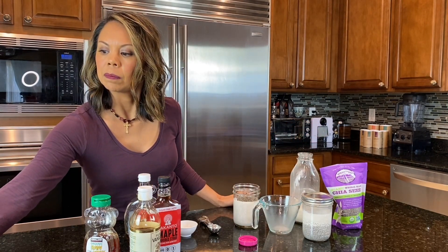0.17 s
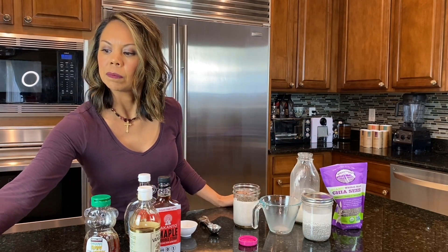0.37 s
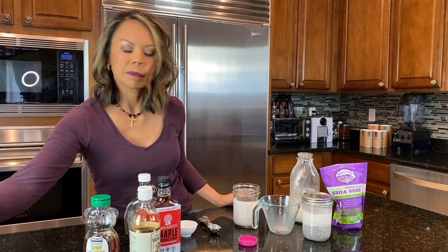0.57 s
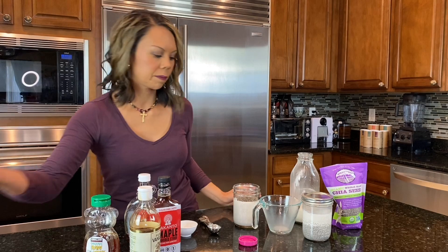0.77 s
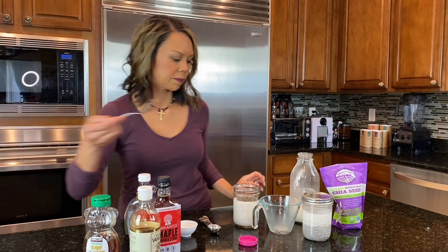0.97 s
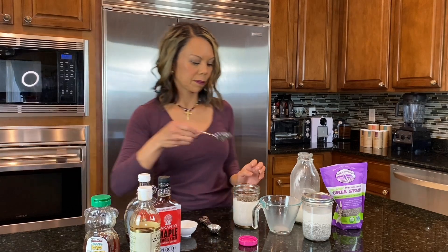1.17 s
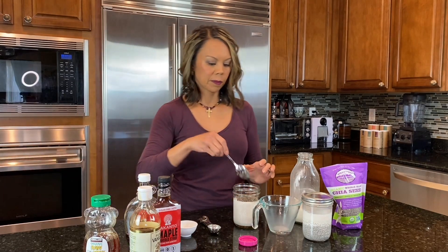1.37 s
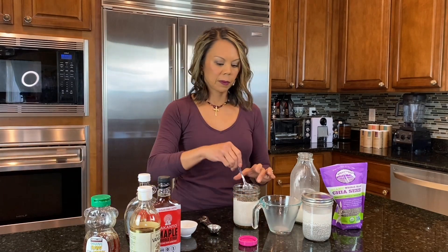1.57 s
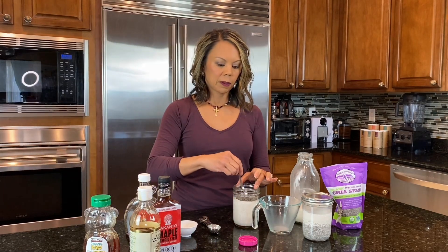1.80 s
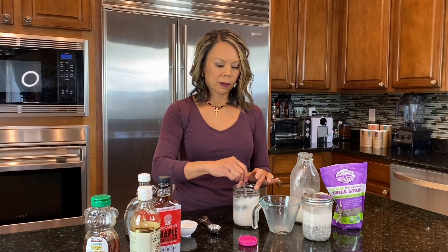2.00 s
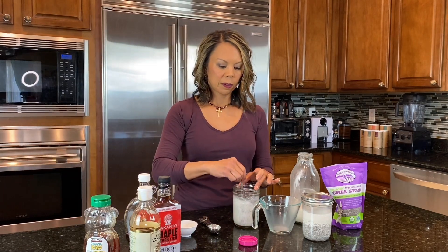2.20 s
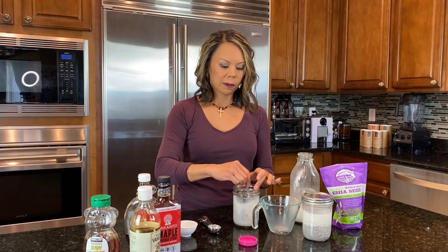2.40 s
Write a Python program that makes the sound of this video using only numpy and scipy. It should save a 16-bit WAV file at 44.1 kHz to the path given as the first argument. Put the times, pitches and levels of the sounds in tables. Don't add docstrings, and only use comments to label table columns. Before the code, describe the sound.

A metal spoon clinks against a glass jar in a hard, reverberant kitchen. Steel spoons clatter in a drawer at 0 and 0.2 s with a wooden thud, then a faint clink at 0.5 s. Soft sleeve rustles lead to a clear ringing rim strike at 1.7 s. Two damped clinks follow near 2.2 s, then dull, skidding bottom knocks from 2.37 s. Low hum and hiss continue throughout.

```python
import sys
import numpy as np
from scipy import signal
from scipy.fft import rfft, irfft
from scipy.io import wavfile
from scipy.ndimage import uniform_filter1d

SR = 44100
rng = np.random.default_rng(int(sys.argv[2]) if len(sys.argv) > 2 else 0)


def gain_from_db(level_db):
    decades = np.asarray(level_db, float) / 20
    return 10 ** decades


def dump(signal):
    limited = np.clip(np.atleast_2d(signal).T, -1, 1)
    pcm = np.round(limited * 32767).astype(np.int16)
    wavfile.write(sys.argv[1], SR, pcm)


N = 108045
LEAD = 4410


def read(points, hz):
    f, value = np.transpose(points)
    return np.interp(np.log(hz + 1), np.log(f + 1), value)


def add(mix, s, sound):
    part = mix[round(s * SR) + LEAD:][:len(sound)]
    part += sound[:len(part)]


def colour(x, gain):
    return irfft(rfft(x) * gain(np.fft.rfftfreq(x.shape[-1], 1 / SR)), x.shape[-1])


def struck(hits, modes, crack):
    favour_db, favour_octaves = 8, 0.089
    contact_s, crack_t60_s = 0.00054, 0.012
    tick_db, tick_t60_s, tick_hz = -11, 0.007, 11000
    ring_send_db, crack_send_db = -3, -2
    rings, cracks, ticks = np.zeros((3, N + LEAD))
    t = np.arange(SR // 2) / SR
    short_t = t[:2048]
    hz, db, t60 = np.transpose(modes)[:, :, None]
    noise = rng.standard_normal((len(hits), 2048))
    for (s, level_db, tilt_db, crack_db, near_hz), hiss in zip(hits, noise):
        def blow_db(f):
            near = np.exp(-(np.log2(f / near_hz + 0.0041) / favour_octaves) ** 2)
            return tilt_db * np.log2(f / 2000 + 0.026) + favour_db * near

        ring = (gain_from_db(db + blow_db(hz) - 60 * t / t60) * np.sin(2 * np.pi * hz * t)).sum(0)
        add(rings, s, gain_from_db(level_db - 7.0) * ring * (1 - np.exp(-t / contact_s)))

        burst = colour(hiss, lambda f: gain_from_db(read(crack, f) + blow_db(f)))
        crack_fade = gain_from_db(level_db + crack_db + 18.0 - 60 * short_t / crack_t60_s)
        add(cracks, s, crack_fade * burst * np.minimum(short_t / contact_s, 1))

        tick = colour(hiss[::-1], lambda f: gain_from_db(blow_db(f)) * f ** 2 / (f ** 2 + tick_hz ** 2))
        add(ticks, s, gain_from_db(level_db + crack_db + tick_db - 60 * short_t / tick_t60_s) * tick)
    to_walls = gain_from_db(ring_send_db) * rings + gain_from_db(crack_send_db) * cracks
    return np.array([rings + cracks + ticks, to_walls])


# start in [s], level in [dB], brightness in [dB per octave],
# crack share in [dB], favoured mode in [Hz].
CUTLERY_HITS = [(-.04, -24.5, -1, -0.5, 5070), (-.02, -33.5, -0.5, -7.5, 2640),
                (.024, -31, -1.5, 1.5, 7230), (.2188, -17.5, 2, 4.5, 3165), (.2195, -19.5, -0.5, 7, 2640),
                (.2258, -19, 2.5, -17, 7230), (.2355, -21, -4.5, -9, 2640), (.244, -26, -7.5, -8.5, 2640),
                (.2485, -20.5, -3.5, -8, 1494), (.265, -29.5, -2, -11.5, 7230),
                (.4778, -34, -3.5, -2, 2890), (.479, -39, -0.5, -9, 4960), (.4795, -44.5, 5, 5, 6885),
                (.489, -44.5, -4.5, -3, 1494)]
# mode in [Hz], level in [dB], decay t60 in [s].
SPOON_MODES = [(1068, -19, 0.041), (1494, -2, 0.028), (1865, -7, 0.056), (2640, -4.5, 0.07),
               (3165, -13.5, .04), (4733, -17.5, 0.25), (5310, -20, 0.035), (6885, -16, 0.089),
               (3700, -14, .02), (7230, -5, 0.05), (8460, -10.5, 0.021), (10290, -19, 0.12),
               (5900, -16.5, 0.025), (13730, -20, .1)]
# frequency in [Hz], level in [dB].
CUTLERY_CRACK = [(100, -23), (400, -13), (900, -10), (2900, -8), (4200, -19), (5300, -9.5), (6400, -17),
                 (14500, -37.5)]


def cutlery():
    return struck(CUTLERY_HITS, SPOON_MODES, CUTLERY_CRACK)


# start in [s], level in [dB].
DRAWER_THUDS = [
    (-.04, -47),
    (.221, -29),
    (2.37, -54),
]
# mode in [Hz], level in [dB], decay t60 in [s].
PANEL_MODES = [(85.25, -0.5, .2), (110.9, -4, .2), (217, -12.5, 0.092), (300, -7, 0.15), (491, -8, 0.059),
               (742.6, 3, .07), (781, -1, 0.14)]


def drawer_thuds():
    out, t = np.zeros(N + LEAD), np.arange(SR // 2) / SR
    hz, db, t60 = np.transpose(PANEL_MODES)[:, :, None]
    swell = 1 - np.exp(-t * hz / 2.0)
    ring = (gain_from_db(db - 60 * t / t60) * swell * np.sin(2 * np.pi * hz * t)).sum(0)
    for s, level_db in DRAWER_THUDS:
        add(out, s, gain_from_db(level_db) * ring)
    return out


# start in [s], level in [dB], brightness in [dB per octave],
# crack share in [dB], favoured mode in [Hz].
RIM_HITS = [
    (1.6845, -13, 1.5, -8, 3493),
]
# mode in [Hz], level in [dB], decay t60 in [s].
RIM_MODES = [(926, -14, 0.043), (1107, -10, 0.046), (1623, -11, 0.24), (1619.6, -4, 0.11),
             (2270, -16.5, 0.013), (5160, -18.5, 0.05), (3672, -3, 0.11), (3727, -17.5, 0.15),
             (4602, -15, 0.069), (5716, -16.5, 0.039), (5760, 3, 0.05), (9500, -18, 0.05),
             (11460, -16.5, 0.02), (14570, -18.5, .04)]
# frequency in [Hz], level in [dB].
RIM_CRACK = [(150, -25.5), (500, -24), (1000, -8), (3000, -10.5), (6000, -11.5), (7000, -37), (9000, -14.5),
             (16000, -29.5)]


def jar_rim():
    return struck(RIM_HITS, RIM_MODES, RIM_CRACK)


# start in [s], level in [dB], brightness in [dB per octave],
# crack share in [dB], favoured mode in [Hz].
WALL_HITS = [
    (2.1563, -23.5, 1, -9, 3047),
    (2.1575, -26, -5.5, -14.5, 1700),
    (2.2228, -28.5, -2.5, -11.5, 860),
    (2.224, -30, -0.5, -4.5, 3710),
    (2.2305, -35, -1, -13, 5830),
    (2.252, -54, 4, -24, 5770),
]
# mode in [Hz], level in [dB], decay t60 in [s].
WALL_MODES = [(860, -16.5, 0.037), (1142, -7, 0.045), (1584, -9, 0.074), (1605, -14, 0.098),
              (2020, -5.5, 0.046), (3047, -5.5, 0.021), (3626, -5.5, 0.038), (4950, -20.5, 0.051),
              (5690, -4.5, 0.046), (5768, -11.5, 0.093), (8040, -13.5, 0.019), (10880, -11.5, 0.023)]
# frequency in [Hz], level in [dB].
WALL_CRACK = [(150, -55), (400, -16.5), (1300, -10.5), (3000, -11), (5600, -2), (7000, -12.5), (16000, -21)]


def jar_wall():
    return struck(WALL_HITS, WALL_MODES, WALL_CRACK)


# start in [s], level in [dB], brightness in [dB per octave],
# crack share in [dB], favoured mode in [Hz].
BOTTOM_KNOCKS = [(2.3662, -22, 4, -11.5, 1250), (2.3695, -33, 8, -11.5, 1550), (2.373, -28, -1, -28, 1550),
                 (2.3772, -38.5, -6.5, -5.5, 1660), (2.3865, -35.5, -3.5, -11.5, 1250),
                 (2.394, -42, -4, -33, 1850), (2.4145, -45, 6, -30, 1000), (2.4243, -34, -3.5, -30, 1250),
                 (2.431, -52, 0, -24.5, 1000), (2.435, -47, 11, -22, 1250), (2.445, -52, 2, -20, 1340)]
# mode in [Hz], level in [dB], decay t60 in [s].
BOTTOM_MODES = [(300, -17.5, 0.031), (716, -6.5, 0.04), (1000, -7.5, 0.0082), (1250, 0.5, 0.01),
                (1340, -3.5, 0.046), (1550, 0, 0.014), (1850, -10, 0.03), (4680, -2, 0.0061),
                (4920, -5, 0.0068)]
# frequency in [Hz], level in [dB].
KNOCK_CRACK = [(59, -47), (100, -32), (930, -6), (1330, 3.5), (3000, -24), (10000, -30.5), (16000, -67)]


def jar_bottom():
    return struck(BOTTOM_KNOCKS, BOTTOM_MODES, KNOCK_CRACK)


# start in [s], level in [dB], centre in [Hz].
RUSTLES = [
    (0.809, -76, 1380),
    (1.034, -75.5, 1610),
    (1.117, -74.5, 1430),
    (1.16, -88, 1400),
    (1.551, -57.5, 300),
    (1.58, -66, 412),
    (1.674, -59.5, 1740),
]


def rustles():
    out, t = np.zeros(N + LEAD), np.arange(2048) / SR
    for (s, level_db, hz), hiss in zip(RUSTLES, rng.standard_normal((len(RUSTLES), 2048))):
        puff = colour(hiss, lambda f: np.exp(-(np.log2(f / hz + 0.00088) / 0.48) ** 2))
        add(out, s, gain_from_db(level_db + 29) * puff * t / 0.0042 * np.exp(-t / 0.0041))
    return out


# frequency in [Hz], decay t60 in [s].
ROOM = [(100, 0.31), (300, 0.49), (1000, 0.56), (3000, 0.48), (6000, 0.39), (8000, 0.3), (11000, 0.28),
        (16000, 0.11)]
# frequency in [Hz], likeness in [0 to 1].
ROOM_SAME = [(60, 1), (300, 0.17), (1000, 0.66), (3000, 0.79), (5500, 0.1)]


def placed(x, pan_db, room_db, right_delay=0):
    taps = np.zeros((2, SR))
    at = np.arange(160, SR - 20, 20) + rng.integers(0, 20, (2, (SR - 161) // 20))
    np.put_along_axis(taps, at, rng.choice([-1., 1.], at.shape), 1)
    hz, t, z = signal.stft(taps, SR, nperseg=256)
    same = np.clip(read(ROOM_SAME, hz), -1, 1)[:, None]
    z = np.array([z[0], same * z[0] + np.sqrt(1 - same ** 2) * z[1]])
    tail = signal.istft(z * gain_from_db(-60 * t / read(ROOM, hz)[:, None]), SR, nperseg=256)[1]
    tail *= np.minimum(np.arange(tail.shape[1]) / (0.0067 * SR), 1)
    wet = signal.fftconvolve(x[1:], tail / np.linalg.norm(tail[0]), axes=1)[:, :N + LEAD]
    direct = np.array([x[0], np.roll(x[0], right_delay)])
    pan = gain_from_db(np.array([[.5], [-.5]]) * pan_db)
    return (direct * pan + gain_from_db(room_db) * wet)[:, LEAD:]


# frequency in [Hz], density in [dB per Hz].
HUM = [(25, -14.5), (65, -4), (320, -19.5), (1100, -27.5), (3200, -30.5), (7200, -38), (15200, -39),
       (16100, -61)]
# frequency in [Hz], likeness in [0 to 1].
AIR_SAME = [(60, 1), (300, 0.25), (1000, 0.26), (3000, 0.75), (5500, 0.28)]
# time in [s], level in [dB], halved in the bass and doubled near 13
# kHz.
AIR = [(0, 1), (.7, 1.5), (1.0, 2), (1.15, 2), (1.249, -1), (1.38, 1.5), (1.43, -5), (1.539, -2.5),
       (1.58, 4.5), (2.45, 4)]


def kitchen_air():
    hum_db, patch_db = -65.5, 12
    frames, hz = N // 256 + 5, np.fft.rfftfreq(1024, 1 / SR)
    a, b, c, d, patches = rng.standard_normal((frames, 513, 5)).T
    patches = uniform_filter1d(uniform_filter1d(patches, 10, 0), 10, 1)
    same = np.clip(read(AIR_SAME, hz), -1, 1)[:, None]
    left = a + 1j * b
    z = np.array([left, same * left + np.sqrt(1 - same ** 2) * (c + 1j * d)])
    drift_db = np.interp(np.arange(frames) * 256 / SR, *np.transpose(AIR))
    drift_db = drift_db * (.5 + hz / 9000)[:, None]
    gain = gain_from_db(read(HUM, hz)[:, None] + patch_db * patches + drift_db)
    x = signal.istft(z * gain, nperseg=1024, noverlap=768)[1][:, :N]
    return gain_from_db(hum_db) * x / x.std()


def scene():
    drawer = cutlery() + drawer_thuds()
    jar = jar_rim() + jar_wall() + rustles()
    mix = placed(drawer, pan_db=3.9, room_db=1, right_delay=10)
    mix = mix + placed(jar, pan_db=0, room_db=-0.75)
    mix = mix + placed(jar_bottom(), pan_db=-0.68, room_db=-2, right_delay=3)
    return mix + kitchen_air()


def attack_gates(treble):
    block, start = 1024, 358
    jump_db, survive_db, free_db = 13, -21, -15
    count = (N - start) // block
    power = (treble[start:][:count * block] ** 2).reshape(-1, 128).mean(1) + 1e-14
    before = np.r_[power[:8], np.convolve(power, np.ones(8) / 8)[6:-9]]
    jump = np.repeat((power / before > gain_from_db(2 * jump_db)).reshape(-1, 8).any(1), 8)
    peak = np.repeat(power.reshape(-1, 8).max(1), 8)
    keep = ~jump | (power > peak * gain_from_db(2 * survive_db))
    free = jump & (power > peak * gain_from_db(2 * free_db))

    def spread(v):
        return uniform_filter1d(np.pad(np.repeat(v * 1., 128), (start, block), "edge")[:N], 128)

    return spread(free), spread(keep)


def low_pass(x):
    return signal.sosfilt(signal.butter(12, 17120, fs=SR, output="sos"), x)


# frequency in [Hz], left over right in [dB].
BALANCE_DB = [(300, 0.5), (1000, 2), (3000, 3), (5200, 3.5), (6300, 2.5)]
# lower edge in [Hz], upper edge in [Hz].
FLIPPED = [(8350, 10000), (12450, 14100)]


def record(dry):
    shared_above_hz, shared_edge_hz, edge_hz = 6400, 15800, 16600
    flip_depth, leak_db = .97, -27

    def step(f, edge):
        return 1 / (1 + np.exp(np.clip((edge - f) / 70, -50, 50)))

    def sign(f):
        return 1 - 2 * flip_depth * sum(step(f, lo) - step(f, hi) for lo, hi in FLIPPED)

    def port(x, side):
        def gain(f):
            rumble_cut = f ** 2 / (f ** 2 + 28 ** 2)
            return (1 - step(f, shared_above_hz)) * rumble_cut * gain_from_db(side * read(BALANCE_DB, f))
        return colour(x, gain)

    low = np.array([port(dry[0], .5), port(dry[1], -.5)])
    left, right = colour(dry, lambda f: step(f, shared_above_hz) - step(f, edge_hz))
    free, keep = attack_gates(left)
    shared = colour(left, sign) + gain_from_db(leak_db) * right
    high = keep * np.array([left, free * np.roll(right, 1) + (1 - free) * shared])
    high = free * high + (1 - free) * colour(high, lambda f: 1 - step(f, shared_edge_hz))
    return low_pass(low + high)


dry = scene()
out = record(dry)
dump(out)
```